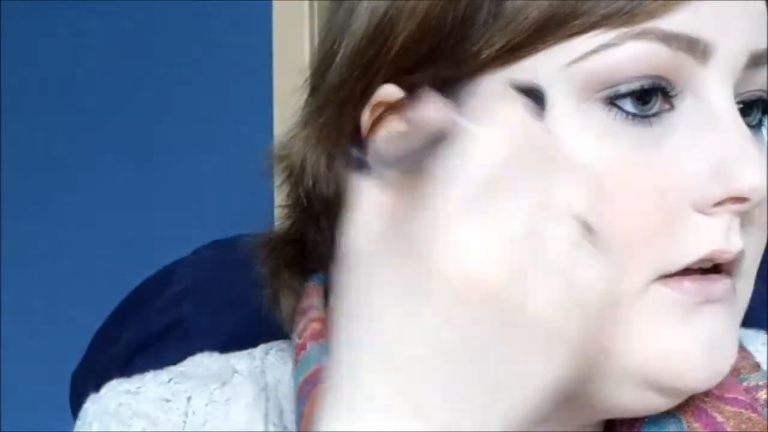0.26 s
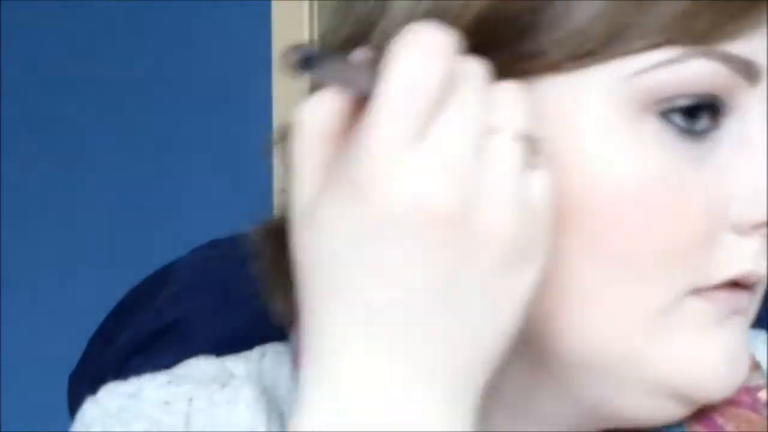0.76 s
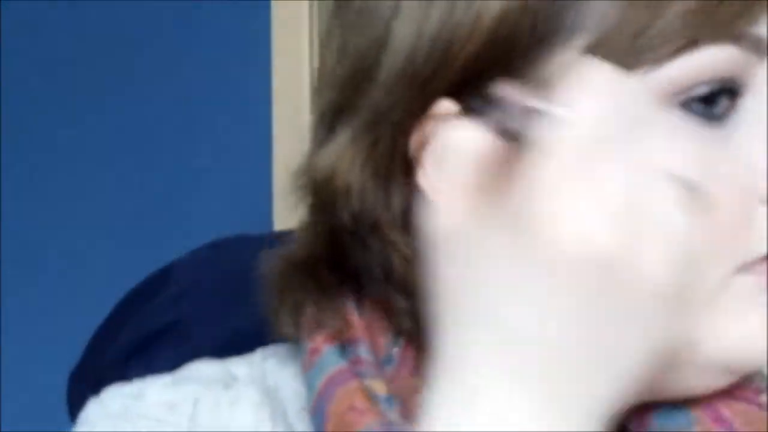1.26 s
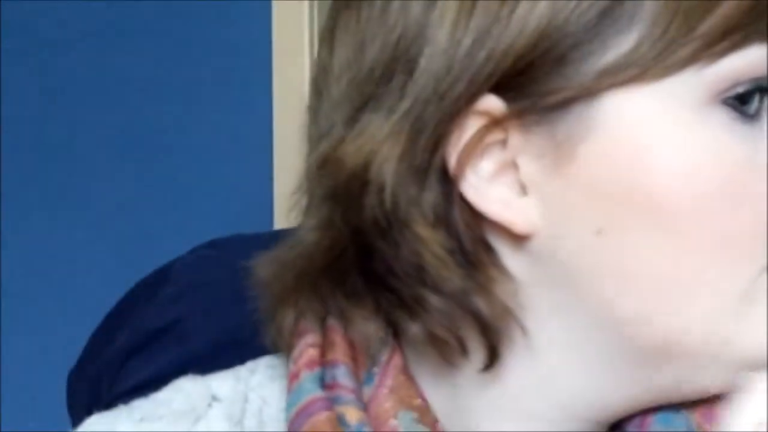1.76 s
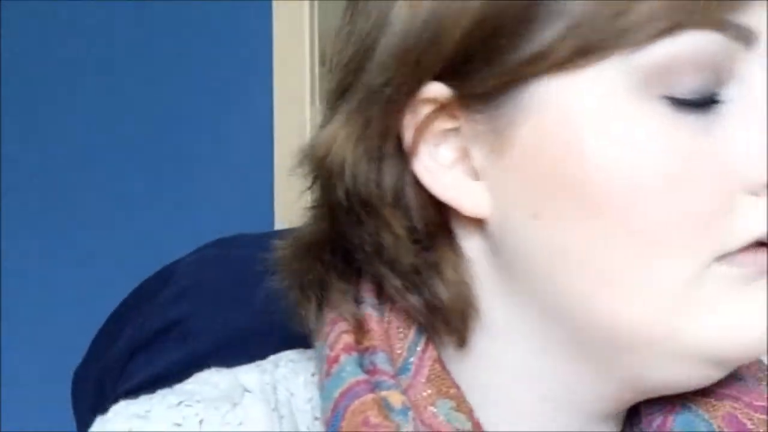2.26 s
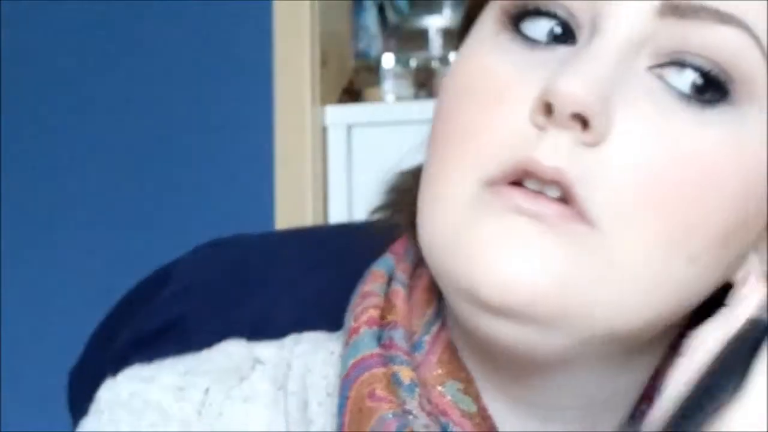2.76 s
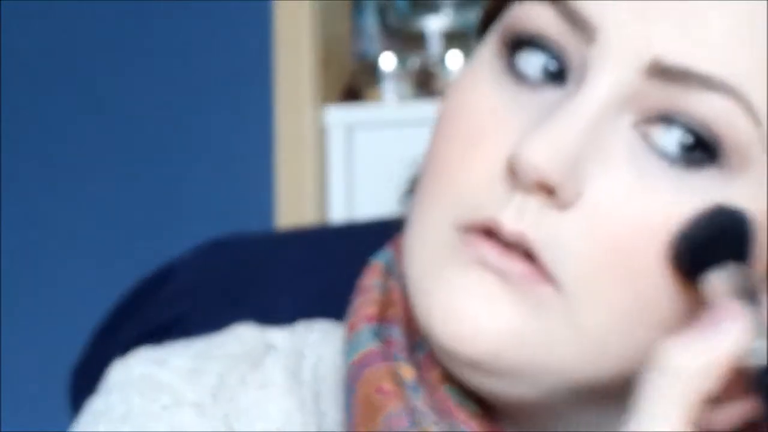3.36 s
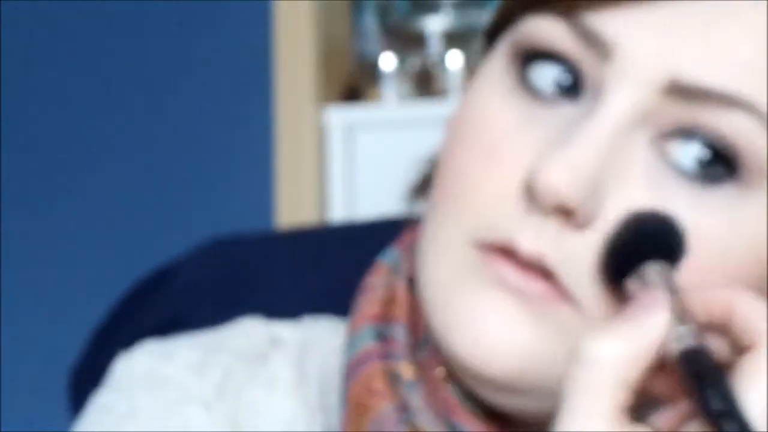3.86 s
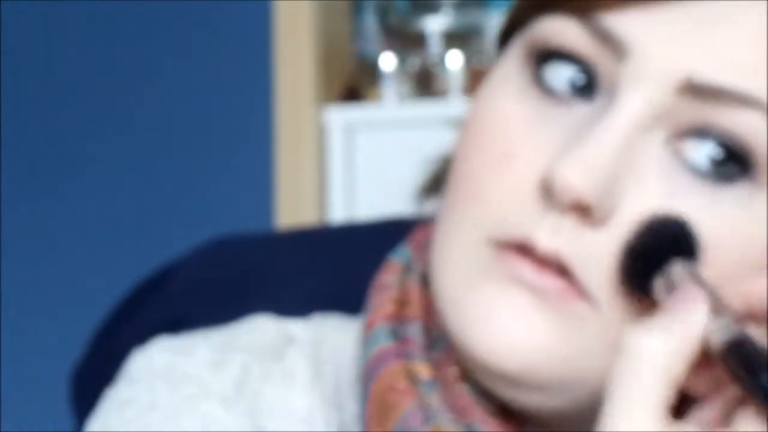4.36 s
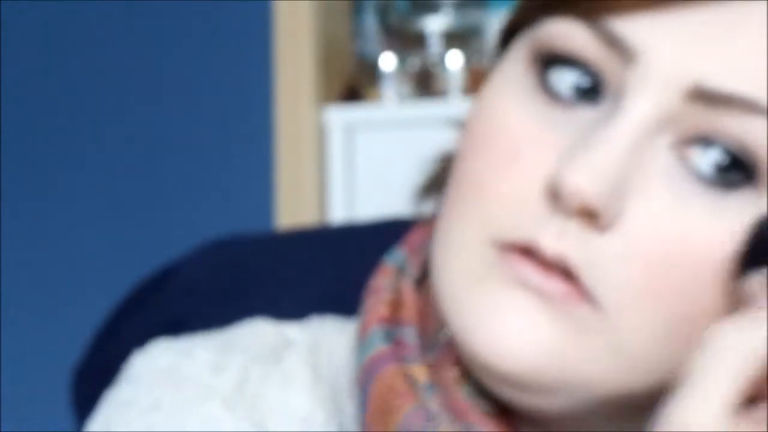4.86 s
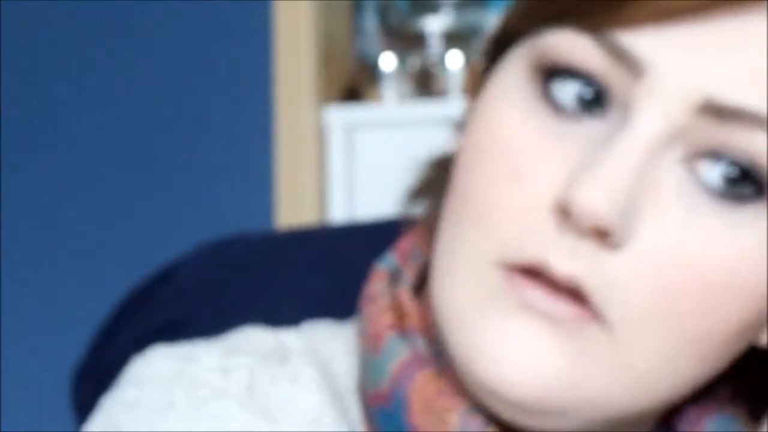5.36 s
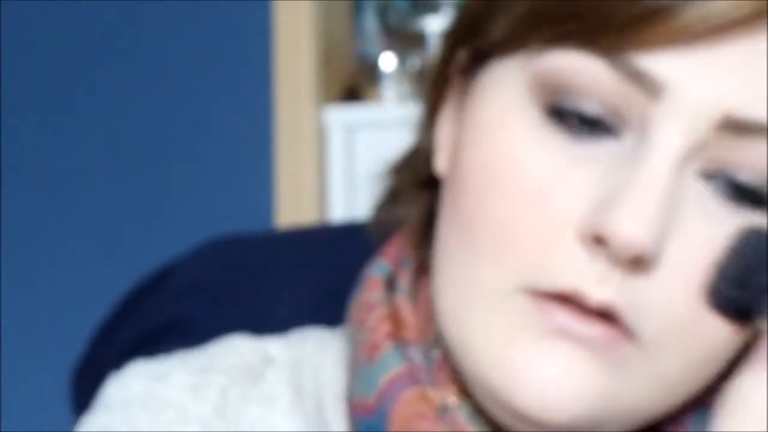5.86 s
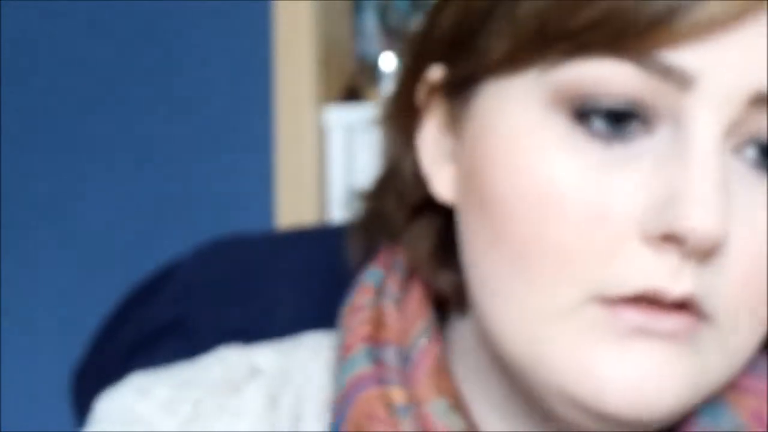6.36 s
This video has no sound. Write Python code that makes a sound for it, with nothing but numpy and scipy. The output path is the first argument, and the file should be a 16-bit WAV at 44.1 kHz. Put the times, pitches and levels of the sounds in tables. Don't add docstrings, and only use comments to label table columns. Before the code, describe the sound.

Close to a small camera in a quiet furnished room, a soft brush whispers faintly over skin. Bursts of tiny focus motor clicks tick and knock through the housing, thickening until a loud plastic lid snap around two seconds. The motor then thins out, leaving hiss, barely audible brushing, a faint far clock, one clear tap on the brush handle and a small fingernail tick near the end.

```python
import sys
import numpy as np
from scipy import signal
from scipy.fft import rfft, irfft
from scipy.io import wavfile

SR = 44100
rng = np.random.default_rng(int(sys.argv[2]) if len(sys.argv) > 2 else 0)


def level_to_linear(level):
    exponent = np.asarray(level, float) / 20
    return 10 ** exponent


def generate_wav(sig):
    pcm = np.round(np.clip(np.atleast_2d(sig).T, -1, 1) * 32767).astype(np.int16)
    wavfile.write(sys.argv[1], SR, pcm)


N = 291927


def in_time(rows):
    s, db = np.transpose(rows)
    return level_to_linear(np.interp(np.arange(N) / SR, s, db))


def at_hz(points, hz):
    point_hz, value = np.array(points)[:, 0], np.array(points)[:, 1]
    return np.interp(np.log(hz + 1e-3), np.log(point_hz), value)


def rms_one(x):
    return x / np.sqrt(np.mean(x ** 2))


def coloured(x, spectrum):
    gain = level_to_linear(at_hz(spectrum, np.fft.rfftfreq(N, 1 / SR)))
    return rms_one(irfft(rfft(x) * gain, N))


def resonate(x, modes, stretch=1.):
    out = 0
    for k, (hz, width, db) in enumerate(modes):
        r = np.exp(-np.pi * width * stretch / SR)
        poles = [1, -2 * r * np.cos(2 * np.pi * hz * stretch / SR), r * r]
        ring = signal.lfilter([(1 - r * r) / 2, 0, (r * r - 1) / 2], poles, x)
        out = out + (-1) ** k * level_to_linear(db) * ring
    return out


def contacts(rows, modes, gain_db, sharp):
    length = 900
    out, t = np.zeros(N + length), np.arange(length) / SR
    for s, db, ms, stretch in rows:
        age = t * 1000 / ms
        rattle = np.sqrt(age) * np.exp(-age) * rng.standard_normal(length)
        click = sharp * (t == 0)
        hit = resonate(rattle + click, modes, stretch)
        at = round(s * SR)
        out[at:at + length] += level_to_linear(db + gain_db) * hit / np.abs(hit).max()
    return out[:N]


def room(x, gap_ms=1.5):
    # pitch_hz, fade_s
    fade_time = [(300, 0.26), (1000, 0.29), (3000, 0.3), (6000, 0.3), (12000, 0.23)]
    t, edges, answer = np.arange(SR // 2) / SR, 200 * 2 ** np.arange(0, 6.6, .5), 0
    for low, high in zip(edges, edges[1:]):
        band_filter = signal.butter(2, [low, high], "band", fs=SR, output="sos")
        band = signal.sosfilt(band_filter, rng.standard_normal(len(t)))
        answer = answer + band * level_to_linear(-60 * t / at_hz(fade_time, np.sqrt(low * high)))
    answer = answer * (1 - np.exp(-(t * 1000 / gap_ms) ** 2))
    return signal.fftconvolve(x, answer / np.sqrt(np.sum(answer ** 2)))[:N]


def microphone_hiss():
    # pitch_hz, level_db (per Hz)
    hiss_colour = [(7.1, -3.5), (12, -3), (20, -1.5), (33, -10), (87, -14.5), (144, -18), (231, -21.5),
                   (371, -25), (849, -32), (984, -34.5), (1680, -38), (2390, -40), (8040, -48),
                   (14100, -53.5)]
    return level_to_linear(-47) * coloured(rng.standard_normal(N), hiss_colour)


def whine():
    whine_hz, flips_per_s, whine_db = 7867.1, 29.97, -74
    t = np.arange(N) / SR
    flip = np.tanh(8. * np.sin(np.pi * flips_per_s * t))
    phase = 2 * np.pi * whine_hz * t
    return level_to_linear(whine_db) * (flip * np.sin(phase) + .38 * np.cos(phase))


def air_sway():
    # time_s, level_db
    push_level = [(0, -45.5), (.5, -52), (.9, -44.5), (1.25, -46), (1.45, -36), (1.9, -28), (2.2, -49),
                  (2.5, -51), (6.62, -45)]
    push_colour = [(1, -30), (3, -9.5), (5.5, 13.5), (8.5, -3), (12, -9), (18, -56.5)]   # Hz, dB per Hz
    reach = np.minimum(in_time(push_level), level_to_linear(-42))
    return reach * coloured(rng.standard_normal(N), push_colour)


def far_clock():
    # pitch_hz, width_hz, level_db
    clock_case = [(865, 120, 2.5), (1500, 680, -10), (2030, 430, -7), (2970, 870, -20), (4240, 280, -11)]
    first_s, period_s = .928, .9995
    level_db, rise_db_per_s = -62, 0.62
    ticks = [(s, level_db + rise_db_per_s * s, 3.5, 1.) for s in np.arange(first_s, N / SR, period_s)]
    return room(contacts(ticks, clock_case, gain_db=15.5, sharp=0.), gap_ms=11.0)


def motor_steps():
    # start_s, length_ms, first_knock_db, last_knock_db
    runs = [(0.0423, 15.5, -45.5, -50), (0.1142, 3.5, -46, -47), (.131, 14, -60, -52), (.205, 32, -45, -51),
            (.247, 13.3, -46, -56), (.8022, 15, -42, -44), (1.1097, 25.2, -38, -59),
            (1.2045, 13.9, -39.5, -43.5), (1.31, 3.2, -47, -44), (1.3975, 11, -41, -50),
            (1.595, 16.5, -53, -49.5), (1.6967, 8, -52, -52.5), (1.7965, 6, -46, -58),
            (2.001, 16.3, -52, -45.5), (2.101, 3.6, -50.5, -50), (2.208, 29.9, -48, -39),
            (2.3051, 2.7, -39, -35.5), (2.419, 13.5, -39.5, -47), (2.439, 13, -48, -56),
            (2.5064, 25.4, -49.5, -45), (2.6067, 24, -52, -45.5), (2.7028, 30.5, -47, -48.5),
            (2.904, 28.7, -47, -47), (3.0049, 16, -45, -41.5), (3.1078, 31, -41.5, -50),
            (3.2048, 33, -45.5, -50), (3.3047, 29, -47.5, -49), (3.616, 4.2, -48.5, -47.5),
            (3.7697, 6.8, -51, -52)]
    # start_s, knock_db, tick_over_knock_db
    nudges = [(.0073, -42, -15), (0.0353, -46, -9), (.046, -44.5, -17), (.301, -44.5, -5),
              (.3292, -48.5, -6), (0.4083, -45.5, -13), (.5951, -39, -8), (.701, -39, -11.5),
              (0.9019, -42, -12), (1.012, -52, -18), (1.099, -47, -4), (1.5069, -47.5, -7),
              (1.8113, -41, -0.5), (1.9184, -46.5, 3), (2.1334, -46.5, 8.5), (2.2186, -52, 11),
              (2.637, -52, -2), (2.8198, -45.5, 0), (3.035, -41, -8), (3.4224, -53, -15), (3.509, -42, 7),
              (3.5364, -48, 7.5), (3.6326, -48, 0), (3.699, -36.5, 5), (3.7128, -49, -14),
              (3.7425, -50.5, -14), (3.7985, -50, 1), (4.0997, -61, 7.5), (6.6014, -45.5, 1)]
    # time_s, tick_over_knock_db
    gear_load = [(0, -22), (.12, -10), (.25, -16), (.8, -9), (1.11, 3), (1.35, -1.5), (1.65, -4),
                 (2.02, -7), (2.1, 7.5), (2.3, 1.5), (2.44, 1), (2.52, -1), (2.64, -8), (2.92, 8),
                 (3.1, -1), (3.3, -1), (3.62, 9.5), (3.77, -10)]
    step_ms = 14.5
    coast_db = -1.5
    slack_ms, slack_db, slack_spread_db = 4.1, -10, 2
    rows = []
    for s, ms, first_db, last_db in runs:
        share = np.linspace(0, 1, max(round(ms / step_ms), 1) + 1)
        inside = (share > 0) & (share < 1)
        knock_db = first_db + share * (last_db - first_db) + coast_db * inside
        rows += zip(s + share * ms / 1000, knock_db)
    s, db = np.transpose(rows)
    slack_level = db + slack_db + slack_spread_db * rng.standard_normal(len(s))
    s, db = np.append(s, s - slack_ms / 1000), np.append(db, slack_level)
    load_db = np.interp(s, *np.transpose(gear_load))
    return np.hstack([[s, db, load_db], np.transpose(nudges)])


def focus_motor():
    # pitch_hz, width_hz, level_db
    barrel = [(1120, 335, 17), (1380, 370, -27)]
    # pitch_hz, width_hz, level_db
    housing = [(2060, 250, -6), (2525, 470, 2.5), (3500, 590, 1), (5380, 610, -9.5)]
    # pitch_hz, width_hz, level_db
    gears = [(5000, 1250, -1.5), (6220, 220, 4.5), (7300, 450, 3), (9090, 400, 2), (10050, 900, -6),
             (12340, 1500, -9.5), (14560, 830, -12)]
    # start_s, level_db, rattle_ms, pitch_khz
    shivers = [
        (.414, -50, 1.5, 7.3),
        (.414, -52, 1.5, 10.5),
        (1.116, -48, 2.5, 6.9),
        (1.122, -46, 1.5, 6.9),
        (1.132, -49, 3.0, 6.9),
        (1.15, -53, 3.0, 6.9),
        (2.4187, -40, .3, 12.5),
        (3.420, -49, 2.0, 9.8),
        (3.638, -51, 2.5, 12.8),
        (3.775, -51, 2.0, 9.7),
    ]
    s, knock_db, load_db = motor_steps()
    chance = rng.standard_normal((len(s), 2))
    thud_db = knock_db - 10.5 - 0.16 * load_db + 2.5 * chance[:, 1]
    tick_db = knock_db + load_db
    detune, ms = 1 + .015 * chance[:, 0], np.ones(len(s))
    thuds = contacts(list(zip(s + 0.001072, thud_db, 1.97 * ms, detune)), barrel, gain_db=5.0, sharp=1.0)
    knocks = contacts(list(zip(s, knock_db, .6 * ms, detune)), housing, gain_db=4., sharp=2.5)
    ticks = contacts(list(zip(s, tick_db, 0.56 * ms, detune)), gears, gain_db=4.5, sharp=1.65)
    spring = contacts(shivers, [(1000, 30, 0)], gain_db=-3., sharp=0.)
    return thuds + knocks + ticks + spring


def lid():
    # start_s, level_db, rattle_ms
    catch = [
        (2.3236, -4.5, .12),
        (2.3247, -14, .4),
        (2.3257, -9, .5),
        (2.3270, -9, .6),
        (2.3286, -15, .9),
        (2.3308, -21, 1.5),
    ]
    # pitch_hz, width_hz, level_db
    shell = [(397, 160, -8.5), (715, 148, -11), (844, 150, -3), (1588, 73, 7.5), (2010, 210, 5),
             (2494, 230, 4), (3300, 190, 3.5), (4130, 180, 6.5), (4720, 190, -1), (5260, 470, 0),
             (6420, 370, -1), (7250, 170, -0.5), (8950, 780, -12), (10200, 480, -4.5), (12400, 1500, -14.5)]
    # pitch_hz, level_db (per Hz)
    tail_colour = [(200, -47), (300, -27), (420, -4), (600, -12), (720, -4), (920, 3), (1150, -13),
                   (1600, -3.5), (2400, -4), (4800, -5.5), (6800, -13.5), (8200, -17), (10500, -14),
                   (14300, -25)]
    snap = contacts([(s, db, ms, 1.) for s, db, ms in catch], shell, gain_db=0., sharp=9.0)
    click = np.zeros(N)
    click[round(catch[1][0] * SR)] = 1
    return snap + level_to_linear(-52) * coloured(room(click), tail_colour)


def handle_taps():
    # start_s, level_db
    ring_taps = [
        (4.958, -28),
        (4.9925, -53),
    ]
    # pitch_hz, width_hz, level_db
    handle = [(1620, 130, 1.5), (2430, 300, -9), (3260, 210, 1), (4650, 360, -5), (6800, 1400, -26)]
    # start_s, level_db
    nail_taps = [
        (6.4192, -44),
        (6.4257, -36.5),
    ]
    # pitch_hz, width_hz, level_db
    nail = [(2320, 600, -2), (4500, 380, -1), (7060, 340, -18)]
    ring_sound = contacts([(s, db, .15, 1.) for s, db in ring_taps], handle, gain_db=-0.5, sharp=14.0)
    nail_sound = contacts([(s, db, .3, 1.) for s, db in nail_taps], nail, gain_db=0.5, sharp=3.0)
    return ring_sound + nail_sound


def brush():
    # time_s, level_db
    stroke_level = [(0, -52.5), (.3, -63.5), (.8, -67), (1.0, -59.5), (1.65, -66.5), (1.97, -58.5),
                    (2.2, -67), (2.53, -54.5), (2.9, -62.5), (3.96, -61), (4.4, -71), (4.8, -68),
                    (5.1, -70), (5.5, -60), (5.66, -66), (5.9, -58.5), (6.07, -66), (6.4, -56)]
    # pitch_hz, level_db (per Hz)
    bristle_colour = [(500, -8), (1000, 1.5), (2000, -4), (3500, -8.5), (5500, -11.5), (8000, -19),
                      (12000, -30)]
    grains_per_s = 5000.
    sizes = level_to_linear(2.5 * np.minimum(rng.exponential(1, N), 5)) * rng.choice([-1, 1], N)
    grains = sizes * (rng.random(N) < grains_per_s / SR)
    return level_to_linear(-5.0) * in_time(stroke_level) * coloured(grains, bristle_colour)


def scene():
    background = air_sway() + microphone_hiss() + whine()
    touches, motor = handle_taps(), focus_motor()
    near_room = room(level_to_linear(-11.5) * touches + level_to_linear(-17.5) * motor)
    near = lid() + touches + motor + near_room
    return (near + far_clock() + brush() + background)[None]


def top_cut(x):
    return signal.sosfilt(signal.butter(12, 15120, fs=SR, output="sos"), x)


def record(dry):
    treble_cut = signal.ellip(7, .5, 25, 14180, fs=SR, output="sos")
    mix = signal.sosfilt(treble_cut, dry)
    return top_cut(mix)


dry = scene()
out = record(dry)
generate_wav(out)
```